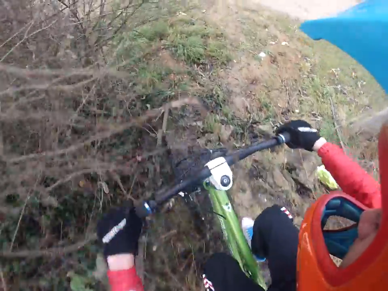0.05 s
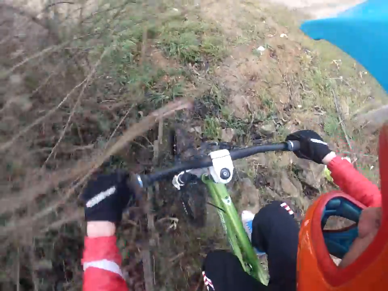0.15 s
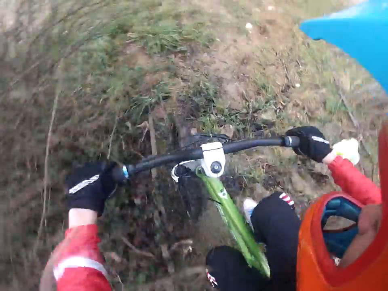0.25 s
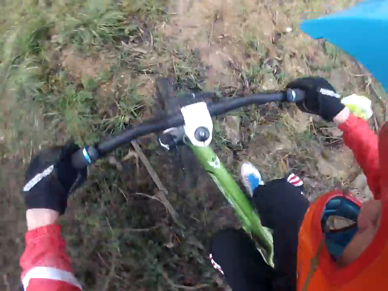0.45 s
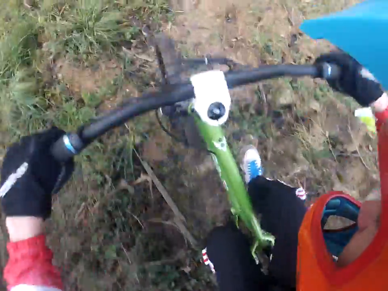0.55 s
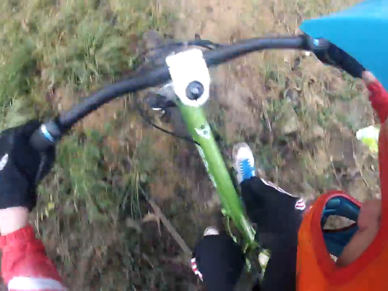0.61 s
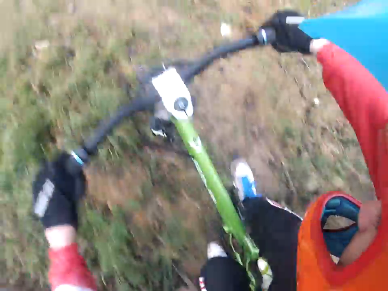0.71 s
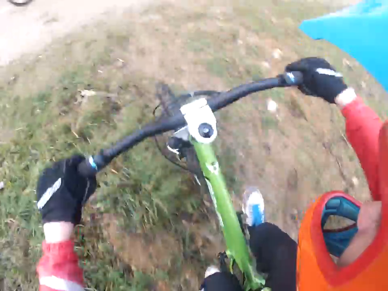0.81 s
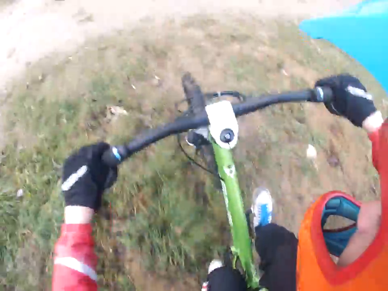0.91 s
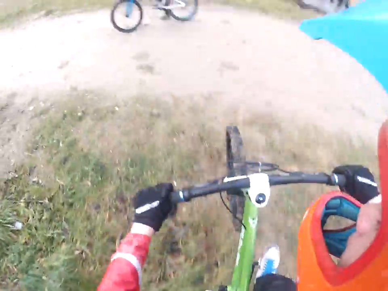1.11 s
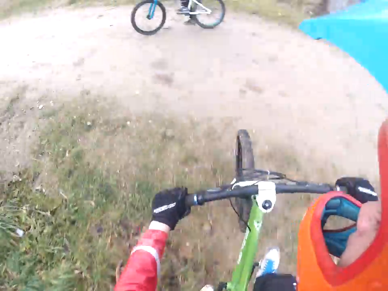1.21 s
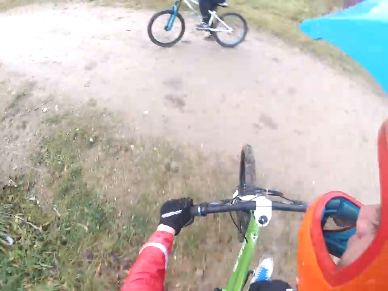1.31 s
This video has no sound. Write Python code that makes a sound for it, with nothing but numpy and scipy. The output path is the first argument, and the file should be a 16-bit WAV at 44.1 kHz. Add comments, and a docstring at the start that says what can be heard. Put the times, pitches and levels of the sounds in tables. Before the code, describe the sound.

Mountain bike chain and frame rattle sharply, followed by deep wheel thuds and wind rumble.

```python
"""Mountain bike down a rough grassy bank.

Heard from a camera on the rider. Chain and cables clatter on the frame, each blow a set of
damped modes plus a noise crack; the hardest clip the microphone and leave steel parts ringing.
The wheels then thud over three main bumps and roll on with low rumble and faint freewheel ticks."""
import sys
import numpy as np
from scipy import signal
from scipy.fft import rfft, irfft, next_fast_len
from scipy.io import wavfile

SR = 44100
rng = np.random.default_rng(int(sys.argv[2]) if len(sys.argv) > 2 else 0)


def pcm_store(signal):
    """Save signal as 16-bit PCM."""
    levels = np.round(np.clip(np.atleast_2d(signal), -1, 1) * 32767)
    wavfile.write(sys.argv[1], SR, levels.astype(np.int16).T)


N = 59535
TIME_S = np.arange(N) / SR
BLOW_TIME_S = np.arange(SR // 20) / SR

# wind and ground rumble, before cap and trim (time [s], level [dB])
RUMBLE_ENVELOPE = [(0, -35.5), (.1, -40), (.2, -29.5), (.36, -27.5), (.42, -47), (.5, -34), (.56, -25.5),
                   (.8, -24.5), (1.1, -28.5), (1.22, -32.5), (1.35, -40)]
# tyres on grass (time [s], level [dB])
ROLL_ENVELOPE = [(0, -54), (.16, -56), (.24, -53), (.45, -46), (.65, -52.5), (.8, -52.5), (1.0, -54.5),
                 (1.1, -56.5), (1.35, -59.5)]
# freewheel ticks (time [s], level [dB])
TICK_ENVELOPE = [(0, -47), (.06, -42.5), (.17, -48.5), (.5, -47.5), (.75, -43), (.82, -58), (.9, -47),
                 (1.05, -57.5), (1.35, -59.5)]

# noise spectra (frequency [Hz], relative level [dB])
RUMBLE_SPECTRUM = [(12, -5), (25, -4.5), (40, -2.5), (52, -10), (70, -29.5), (110, -33), (300, -70),
                   (1000, -120)]
ROLL_SPECTRUM = [(30, -11.5), (100, -1), (170, -7), (270, -4.5), (400, -14), (650, -14.5), (1000, -29),
                 (1420, -12.5), (1860, -29), (2250, -20.5), (2800, -27), (7000, -34), (10000, -46),
                 (15000, -48.5)]
SKID_SPECTRUM = [(500, -13), (1500, -1), (2250, 10), (3000, 1.5), (5000, -3), (7000, -13), (9000, -17.5),
                 (15000, -25)]
GRIT_SPECTRUM = [(150, -4.5), (600, 2), (1500, 5.5), (2300, 2), (4000, -4.5), (7000, -8.5), (14000, -17)]
JINGLE_SPECTRUM = [(1000, -16.5), (3000, 5), (7500, 1), (9200, -7), (11000, -1), (15500, -10)]
CRACK_SPECTRUM = [(150, -1.5), (600, -1.5), (950, -10), (1500, -5.5), (3000, 4.5), (4800, 2), (6300, -1),
                  (7400, 1), (8500, -18.5), (11000, -15), (15500, -27.5)]

# modes of the struck parts (frequency [Hz], relative level [dB], t60 [s])
TYRE_MODES = [(161, -4, .06), (224, 1.5, 0.063), (310.4, -4, 0.041), (562, -6, 0.063)]
HANDLEBAR_MODES = [(97.5, 0, 0.96), (218, -3.5, 0.3), (315.6, -12.5, 0.12)]
STEEL_MODES = [(660, -40, .45), (1460, -37, .25), (2254, -35.5, 0.43), (2170, -38.5, .25)]
FRAME_MODES = [(212.6, -24.5, 0.07), (335, -23, 0.072), (520, -25, 0.014), (680.3, -20.5, 0.07),
               (1196, -12.5, 0.043), (1324, -10.5, 0.045), (1417, -2.5, 0.036), (1524.5, -8, 0.044),
               (1863, -3, 0.016), (2195, -2, 0.028), (2386, -5.5, .035), (2940, -12, .02), (3060, -10, .02),
               (3703, -16.5, 0.026), (4184, -26.5, 0.033), (5440, -25.5, .02), (6200, -26.5, 0.015)]

# tyres on roots and stones (time [s], level [dB])
TYRE_HITS = [(.199, -43), (0.2267, -17.5), (0.266, -27), (.302, -24), (0.52, -28.5), (.6, -23),
             (0.684, -34)]
# wheels over bumps (time [s], level [dB])
WHEEL_BUMPS = [(.643, -24), (.703, -24), (.772, -8), (.844, -10), (0.898, -9.5), (.951, -21)]
# jolts to the handlebar (time [s], level [dB])
HANDLEBAR_JOLTS = [(.226, -28), (0.303, -33), (0.364, -34.5), (0.429, -33), (0.59, -33)]
# blows that ring the steel parts (time [s], level [dB])
STEEL_BLOWS = [(.226, 1), (.302, -6), (.365, -5), (.6, -14)]
# square hits on single parts (time [s], frequency [Hz], level [dB], t60 [s])
CLANK_NOTES = [(.2258, 2330, -5.5, .028), (.3016, 668, -7, .05), (.3016, 2180, -1, .025),
               (.3642, 2920, -9, .018), (.405, 1375, -18, .09), (.4298, 7700, -15, .018),
               (.4385, 1370, -20, .04), (.583, 1440, -21, .06), (.5915, 3090, -14, .025),
               (.5915, 880, -22, .055), (.6, 712, -22, .06), (.6, 1400, -11, .045),
               (.6131, 1165, -15, .045), (.6857, 1410, -20.5, .035), (.6857, 3100, -29, .022)]
# chain and cables on the frame (time [s], level [dB], mode tilt [dB], crack [dB], top-octave snap [dB])
FRAME_BLOWS = [(.132, -48, 6, 4, -3), (0.179, -33, 1, -6, -6), (0.2004, -31, -10, -13, -3),
               (0.2253, 1.5, 7, -10.5, -6), (.2312, -14, 5, -20, -15.5), (0.2453, -16.5, -7, -21, -11.5),
               (.2835, -17.5, -8.5, -17, -8), (0.3014, 10.5, 9, -8, -5), (.3105, -9, 0, -18, -4),
               (0.3223, -13, -1.5, -3, -9), (0.3364, -14.5, 4.5, 3.5, -4), (0.3483, -4, 6, 3, -9),
               (0.3518, -15.5, -6, -6.5, -12.5), (.3582, -4, 1, -2.5, -3), (0.3637, 4, 7, -4.5, -7),
               (.3732, -13, 1, -8.5, -7), (0.3794, -12, 20.5, 3.5, -6), (0.385, -10, -2, -9, -8),
               (.3902, -9.5, 6, -1, -8), (0.3932, -12.5, 6, -6, -8), (0.404, -8, 4.5, 0, -2),
               (.4128, -11, -7.5, -15.5, 5), (0.4172, -15.5, 3, -2.5, 8.5), (0.4219, -19.5, 0, -1, 4),
               (.4268, -30, 2, 4, 13), (0.4298, -22, -18, 7, 7), (0.4383, -15, -13, -7, 6),
               (0.4767, -22.5, -6, -23, -17), (.4868, -24, -15, -32.5, -18), (0.4971, -26, -10.5, -31, -13),
               (0.5148, -32.5, -12, -13.5, -9), (0.5365, -26.5, 3, -4, -21), (0.5444, -17, -5, -3, -21.5),
               (0.5534, -20.5, 0, -6, -17), (0.5694, -28, 4, 5, -17), (0.5821, -13, 0, 0, -13),
               (0.5876, -8.5, -3, -10, -16.5), (0.5915, -6.5, -3.5, -16, -13.5),
               (.6000, -3.5, -7, -19, -20), (0.6131, -8, -7.5, -20, -16.5), (0.6857, -20, -1, -10, -6.5),
               (1.008, -45, 1, -11, 5), (1.179, -48, -14.5, -11.5, -8)]

ATTACK_S, CRACK_T60_S = 0.00026, 0.011


def amp(db):
    """Decibels to gain."""
    return 10 ** (np.asarray(db) / 20)


def unit(x):
    """Scale to rms 1."""
    return x / np.sqrt(np.mean(x ** 2) + 1e-20)


def curve(points, s):
    """Linear interpolation of (time, value) points."""
    return np.interp(s, *np.transpose(points))


def noise(spectrum, size, snap_db=0, snap_hz=7800):
    """Coloured noise of rms 1, then shelved: snap_db / 2 below snap_hz, 3 * snap_db / 2 above."""
    m = next_fast_len(size)
    hz = np.fft.rfftfreq(m, 1 / SR)
    point_hz, point_db = np.transpose(spectrum)
    colour_db = np.interp(np.log(hz + 1), np.log(point_hz + 1), point_db)
    shelf_db = snap_db * (1.5 - 1 / (1 + (hz / snap_hz) ** 20))
    gain = unit(amp(colour_db)) * amp(shelf_db)
    return irfft(rfft(rng.standard_normal(m)) * gain, m)[:size]


def add(track, s, sound):
    """Mix a sound into the track at time s."""
    part = track[max(round(s * SR), 0):][:len(sound)]
    part += sound[:len(part)]


def ring(modes, t, detune, tilt_db=0, pivot_hz=1700, tilt_octaves=0.45, scatter_db=2):
    """Damped modes, varied per blow; the contact point favours those above or below the pivot."""
    hz, db, t60_s = np.transpose(modes)[:, :, None]
    size, shift, phase = rng.standard_normal((3, len(modes), 1))
    offset = np.log2(hz / pivot_hz) / tilt_octaves
    gain_db = db + tilt_db * offset * np.exp(-offset ** 2 / 2) + scatter_db * size
    tones = np.sin(2 * np.pi * (hz * (1 + detune * shift) * t + phase))
    return np.sum(amp(gain_db - 60 * t / t60_s) * tones, axis=0)


def struck(modes, hits, length_s, rise_s, detune):
    """One set of modes rung at each hit."""
    out, t = np.zeros(N), TIME_S[:round(length_s * SR)]
    onset = 1 - np.exp(-t / rise_s)
    for s, db in hits:
        add(out, s, amp(db) * onset * ring(modes, t, detune))
    return out


def knock(tilt_db, crack_db, snap_db, damp_db=0, rise_s=ATTACK_S):
    """One contact: frame modes plus a noise crack; damp_db cuts the ring after its first swings."""
    t = BLOW_TIME_S
    damp_s, energy_s = 0.003, 0.0012
    tail_db, tail_t60_s = -30, 0.05
    sustain = amp(-damp_db)
    body = ring(FRAME_MODES, t, detune=0.024, tilt_db=tilt_db)
    body *= sustain + (1 - sustain) * np.exp(-t / damp_s)
    body = unit(body) * np.sqrt(energy_s / t[-1])  # energy of level 1 held for energy_s
    body *= (1 - np.exp(-t / ATTACK_S)) ** 2
    crack = amp(crack_db) * noise(CRACK_SPECTRUM, len(t), snap_db)
    fade = amp(-60 * np.maximum(t - rise_s + ATTACK_S, 0) / CRACK_T60_S)
    tail = amp(tail_db - 60 * t / tail_t60_s)
    return body + crack * (fade + tail) * (1 - np.exp(-t / rise_s))


def rolling(cap_db=-26, trim_db=-1):
    """Low rumble of wind and ground, plus tyre rustle on grass."""
    rumble_db = np.minimum(curve(RUMBLE_ENVELOPE, TIME_S), cap_db) + trim_db
    rumble = amp(rumble_db) * noise(RUMBLE_SPECTRUM, N)
    rustle = amp(curve(ROLL_ENVELOPE, TIME_S)) * noise(ROLL_SPECTRUM, N)
    return rumble + rustle


def freewheel(rate_hz=62, jitter_periods=0.17, scatter_db=2):
    """The freewheel ticks faintly and unevenly as the bike coasts."""
    out = np.zeros(N)
    for k, (late, size) in enumerate(rng.standard_normal((int(rate_hz * N / SR), 2))):
        s = (k + jitter_periods * late) / rate_hz
        tick = knock(tilt_db=-1, crack_db=-9, snap_db=-10, rise_s=0.0015)
        add(out, s, amp(curve(TICK_ENVELOPE, s) + scatter_db * size) * tick)
    return out


def skid(peak_s=0.71, width_s=0.045, peak_db=-56.5):
    """A tyre skids through grass after the drop: a soft swell of noise."""
    swell = np.exp(-((TIME_S - peak_s) / width_s) ** 2 / 2)
    return amp(peak_db) * swell * noise(SKID_SPECTRUM, N)


def tyre_thuds():
    """Tyres knock dully on roots and stones."""
    return struck(TYRE_MODES, TYRE_HITS, length_s=0.1, rise_s=0.0013, detune=0.063)


def bumps(swing_hz=34.2, rise_s=0.011, fall_s=0.03, grit_db=-33.5, grit_s=0.003):
    """Each bump is a deep push that swings out, with a puff of grit at its peak."""
    out, t = np.zeros(N), np.arange(-SR // 10, SR // 5) / SR
    swing = np.exp(-np.abs(t) / np.where(t < 0, rise_s, fall_s)) * np.cos(2 * np.pi * swing_hz * t)
    for s, db in WHEEL_BUMPS:
        grit = amp(grit_db) * np.exp(-np.abs(t) / grit_s) * noise(GRIT_SPECTRUM, len(t))
        add(out, s + t[0], amp(db) * (swing + grit))
    return out


def handlebar_shudder():
    """Jolts excite the handlebar's low modes."""
    return struck(HANDLEBAR_MODES, HANDLEBAR_JOLTS, length_s=0.5, rise_s=0.00075, detune=0.028)


def steel_ring():
    """Steel parts ring on after hard blows."""
    return struck(STEEL_MODES, STEEL_BLOWS, length_s=0.5, rise_s=0.00075, detune=0.0058)


def chain_jingle(start_s=0.302, end_s=0.436, start_db=-49, rise_db=9, links_per_s=700):
    """A dense spray of tiny link contacts that swells and stops."""
    progress = (TIME_S - start_s) / (end_s - start_s)
    swell = amp(start_db + rise_db * np.clip(progress, 0, 1)) * (progress > 0) * (progress < 1)
    contacts = (rng.random(N) < links_per_s / SR) * rng.standard_normal(N)
    grain = noise(JINGLE_SPECTRUM, len(BLOW_TIME_S)) * amp(-60 * BLOW_TIME_S / CRACK_T60_S)
    return swell * unit(signal.fftconvolve(contacts, grain)[:N])


def clanks():
    """A part hit squarely rings briefly with its own note."""
    out, t = np.zeros(N), TIME_S[:SR // 5]
    onset = (1 - np.exp(-t / ATTACK_S)) ** 2
    for s, hz, db, t60_s in CLANK_NOTES:
        tone = np.sin(2 * np.pi * (hz * t + rng.random()))
        add(out, s, amp(db - 60 * t / t60_s) * onset * tone)
    return out


def clatter(soft_db=-11, rise_s_per_db=0.00006, hard_db=-7.5, damp_db_per_db=1.1):
    """Chain and cables strike the frame; grazing blows crack more slowly, hard ones ring less."""
    out = np.zeros(N)
    for s, db, tilt_db, crack_db, snap_db in FRAME_BLOWS:
        rise_s = ATTACK_S + rise_s_per_db * max(soft_db - db, 0)
        damp_db = damp_db_per_db * max(db - hard_db, 0)
        add(out, s, amp(db) * knock(tilt_db, crack_db, snap_db, damp_db, rise_s))
    return out


def scene(hiss_db=-70.5):
    """The whole bike over faint hiss, mono."""
    metal = clatter() + steel_ring() + handlebar_shudder() + clanks() + chain_jingle()
    wheels = skid() + tyre_thuds() + freewheel() + bumps() + rolling()
    hiss = amp(hiss_db) * rng.standard_normal(N)
    return (metal + wheels + hiss)[None]


def record(dry, cutoff_hz=15800):
    """The camera clips the hardest blows, then low-passes steeply."""
    clipped = np.clip(dry[0], -1, 1)
    m = next_fast_len(2 * N)
    lowpass = 1 / (1 + (np.fft.rfftfreq(m, 1 / SR) / cutoff_hz) ** 80)
    return irfft(rfft(clipped, m) * lowpass, m)[None, :N]


dry = scene()
out = record(dry)
pcm_store(out)
```